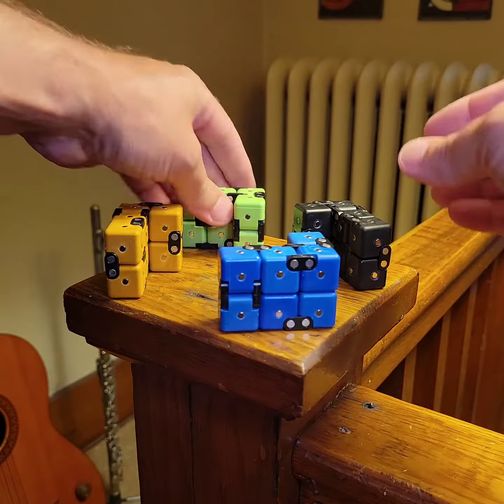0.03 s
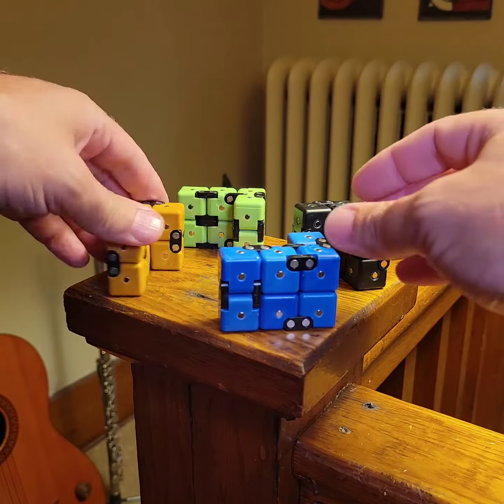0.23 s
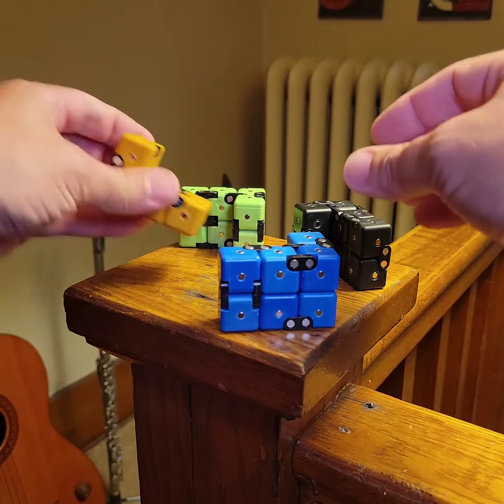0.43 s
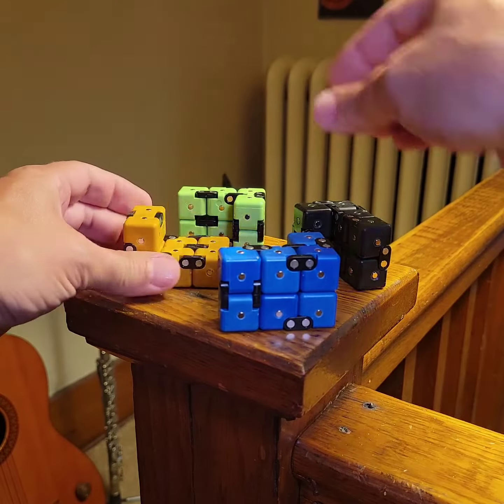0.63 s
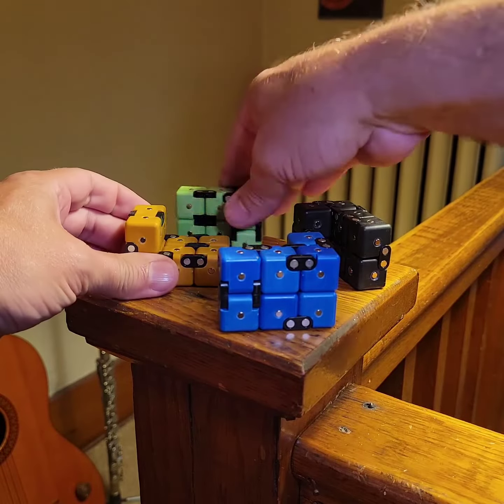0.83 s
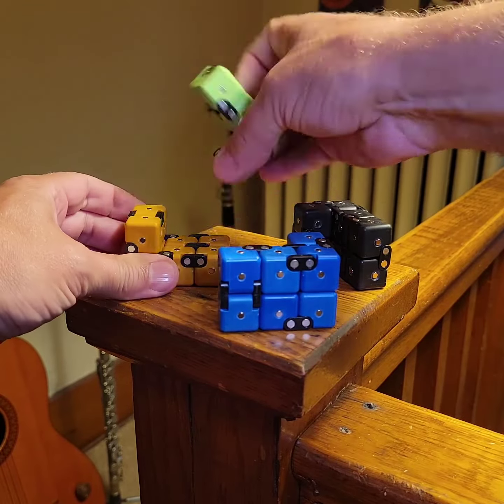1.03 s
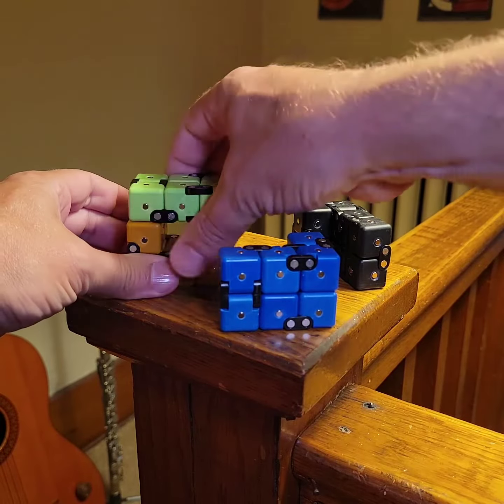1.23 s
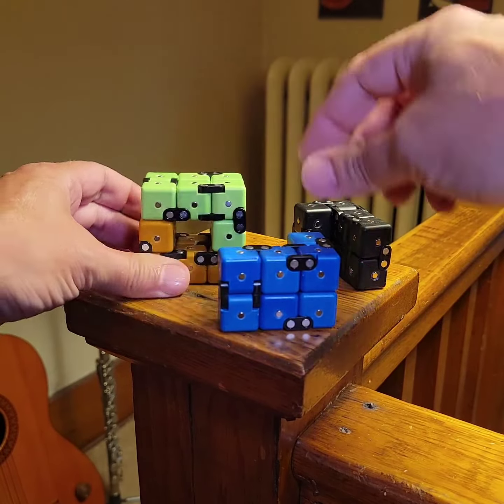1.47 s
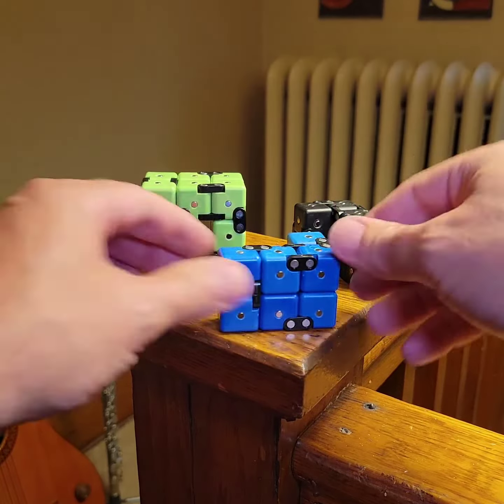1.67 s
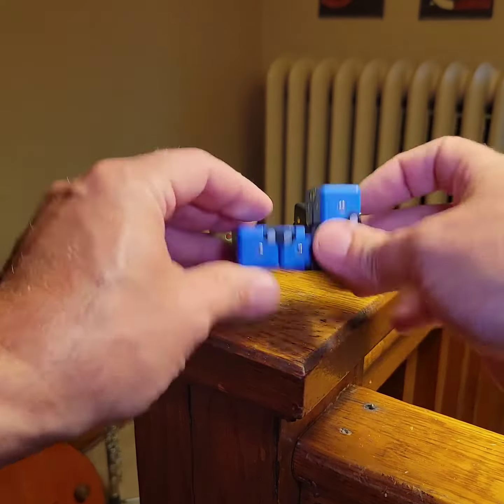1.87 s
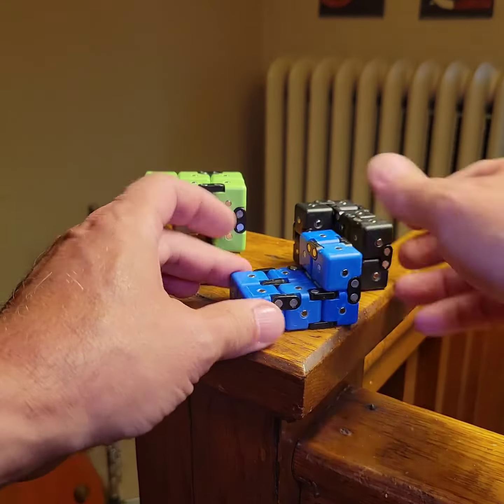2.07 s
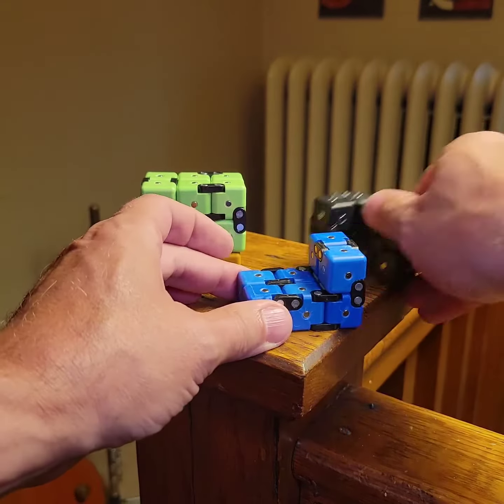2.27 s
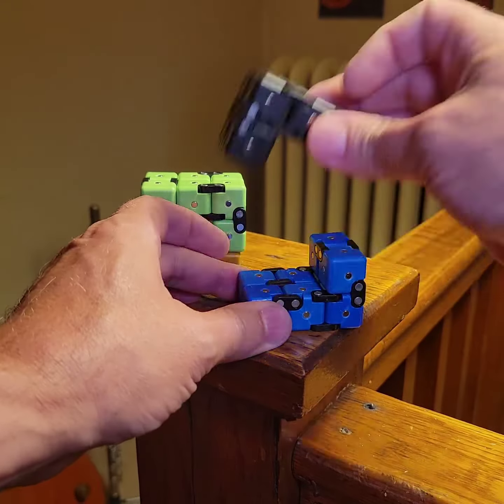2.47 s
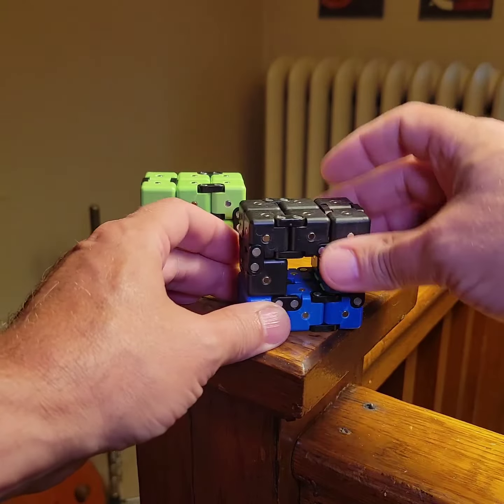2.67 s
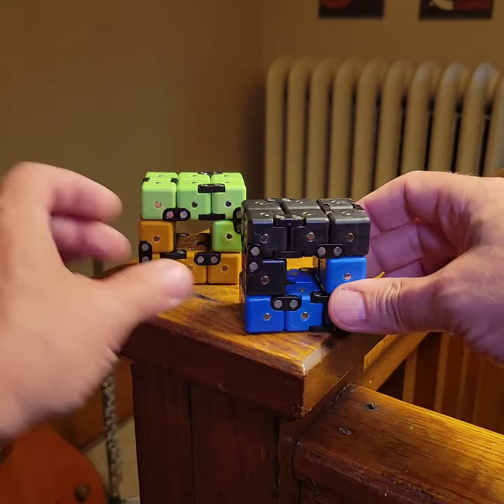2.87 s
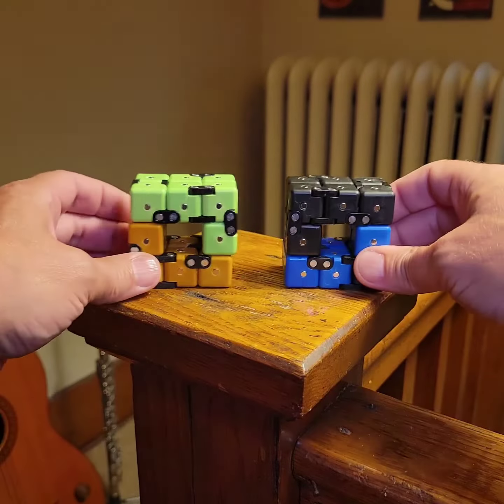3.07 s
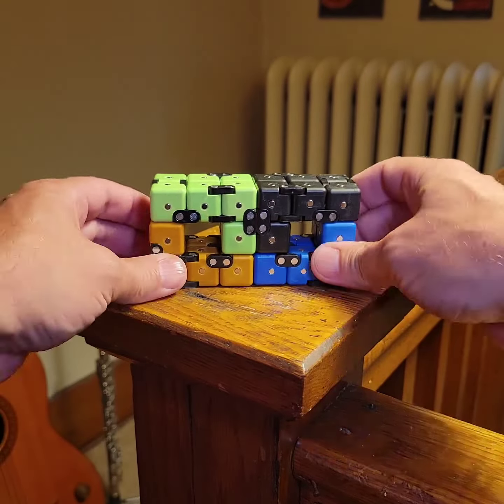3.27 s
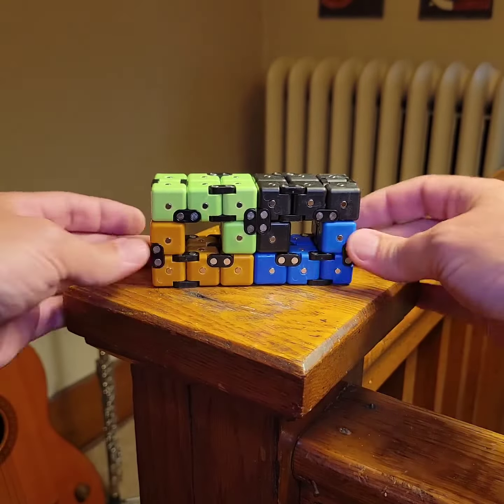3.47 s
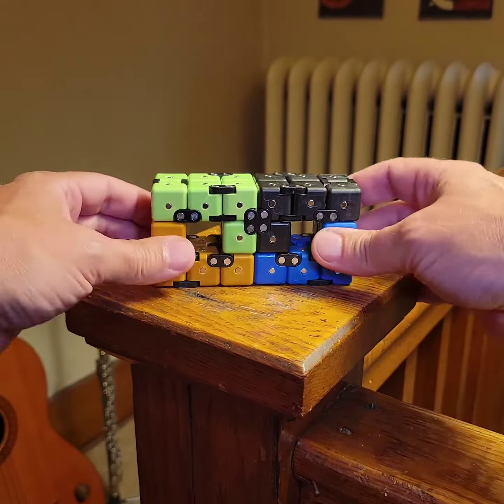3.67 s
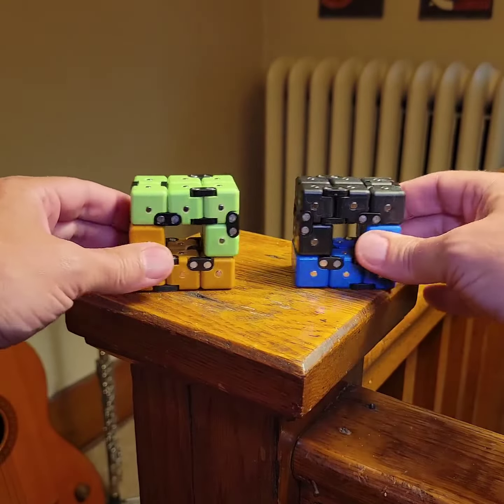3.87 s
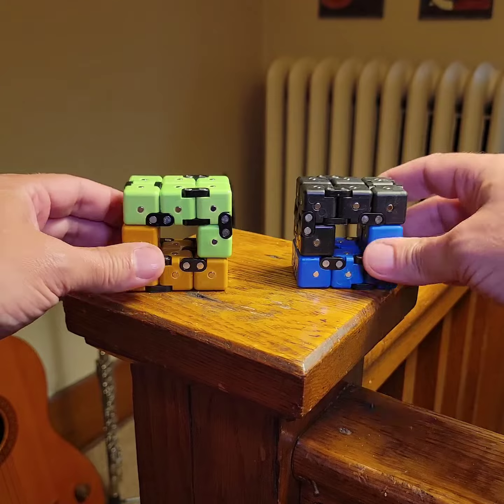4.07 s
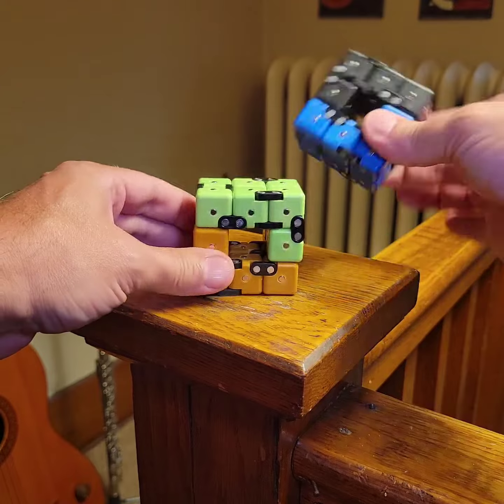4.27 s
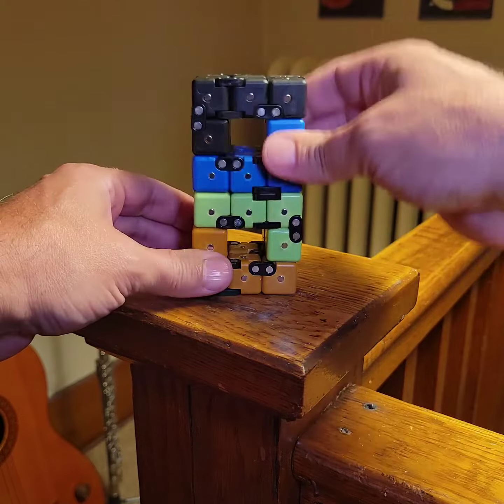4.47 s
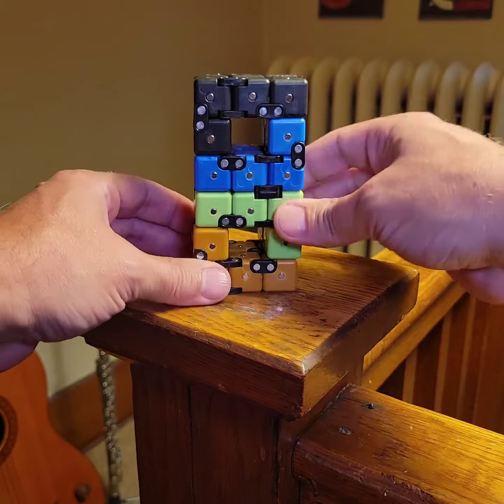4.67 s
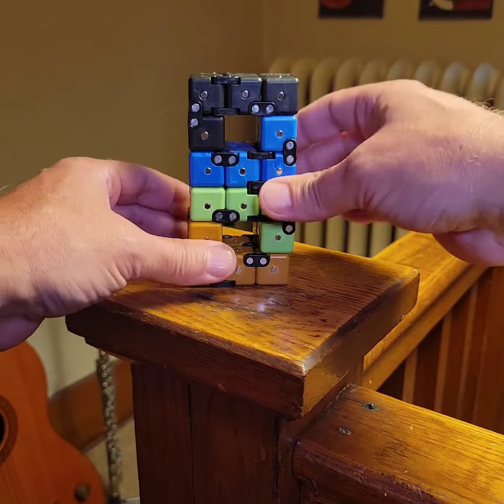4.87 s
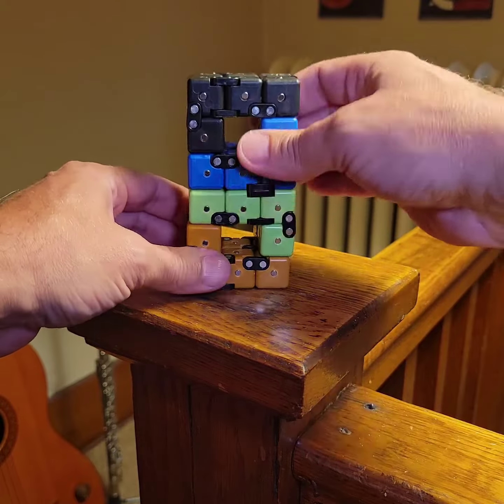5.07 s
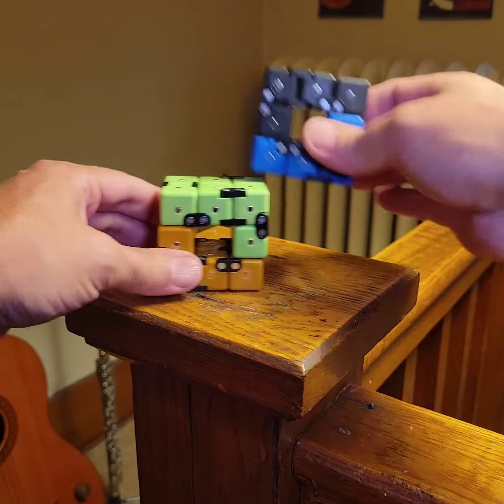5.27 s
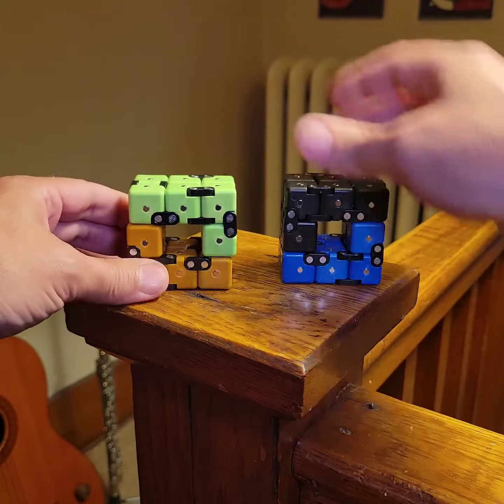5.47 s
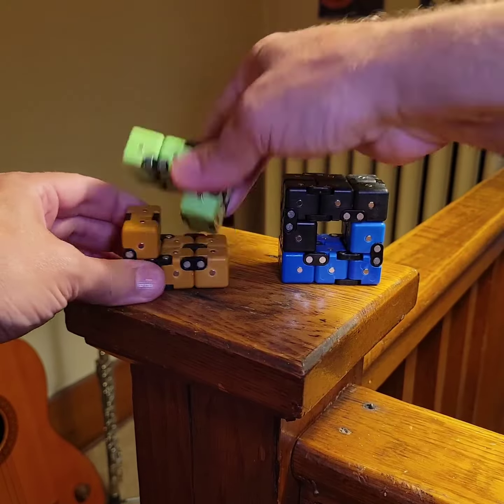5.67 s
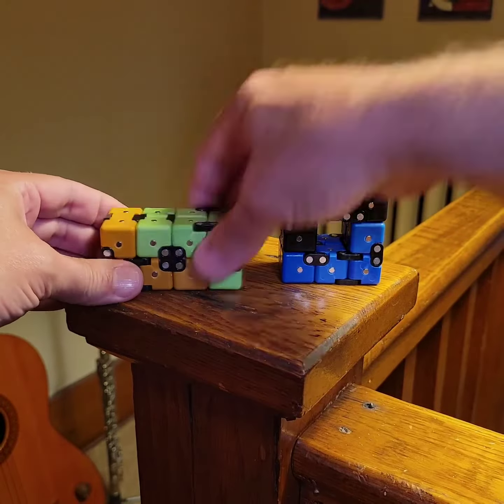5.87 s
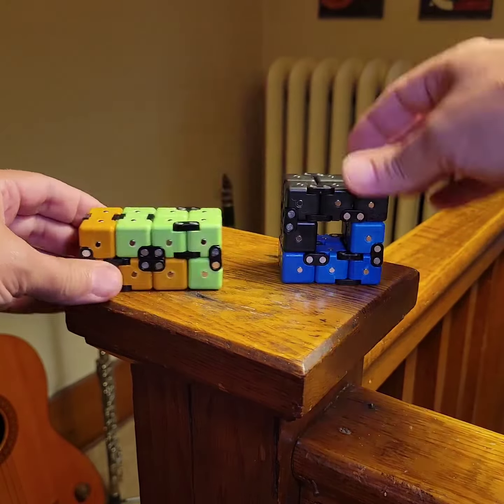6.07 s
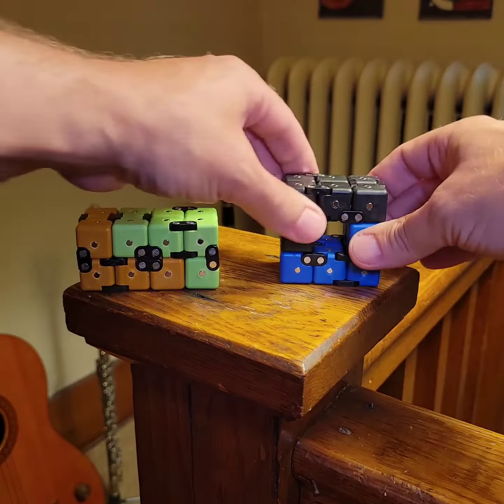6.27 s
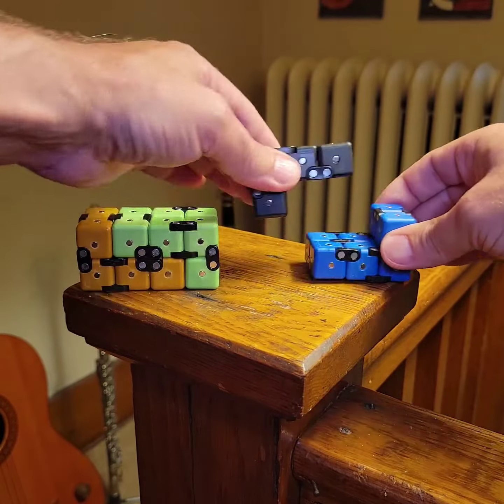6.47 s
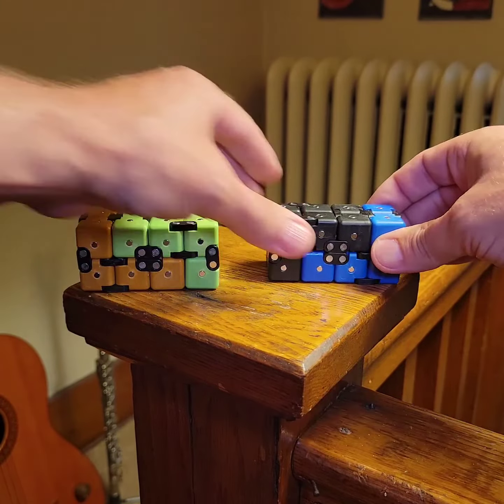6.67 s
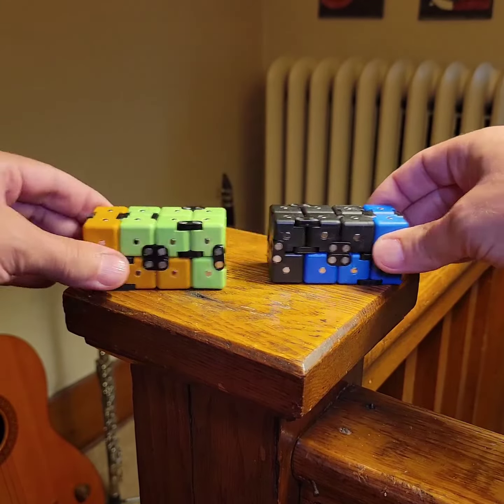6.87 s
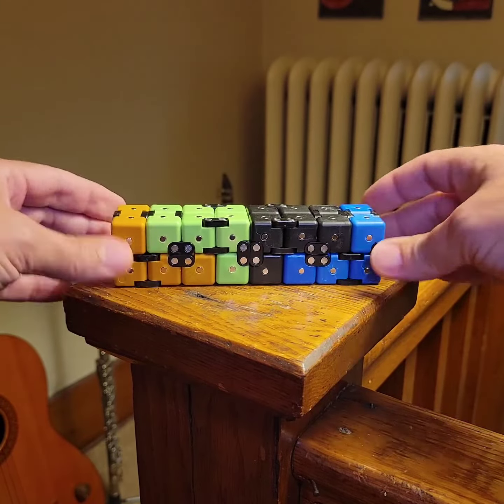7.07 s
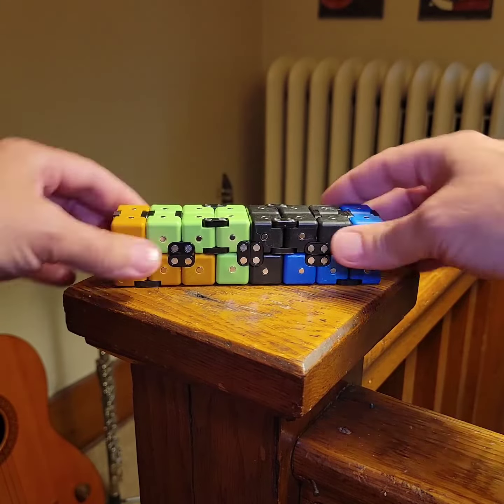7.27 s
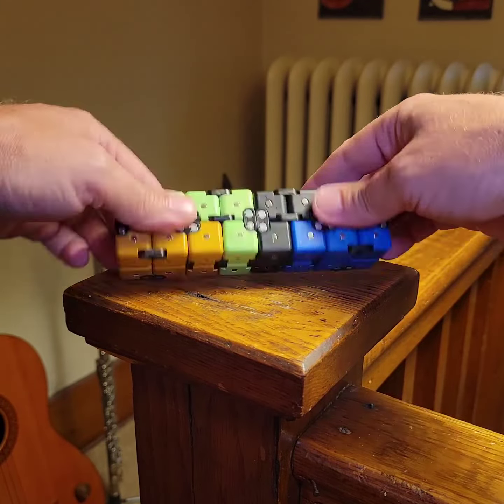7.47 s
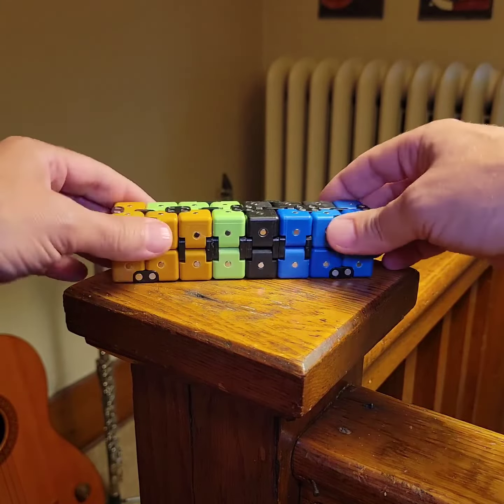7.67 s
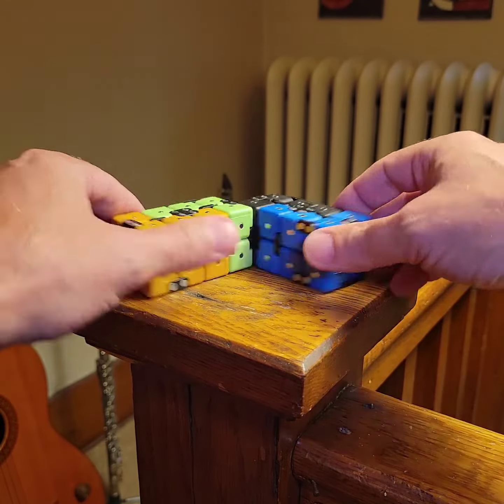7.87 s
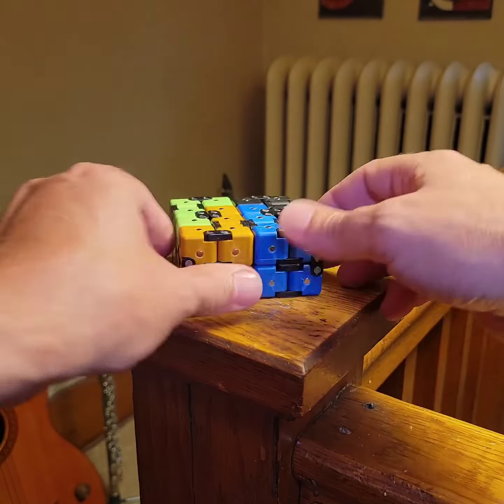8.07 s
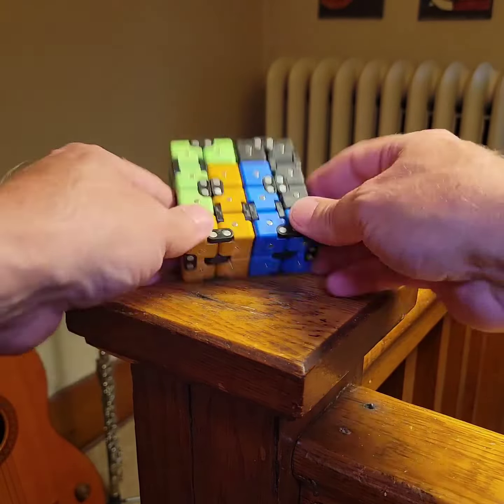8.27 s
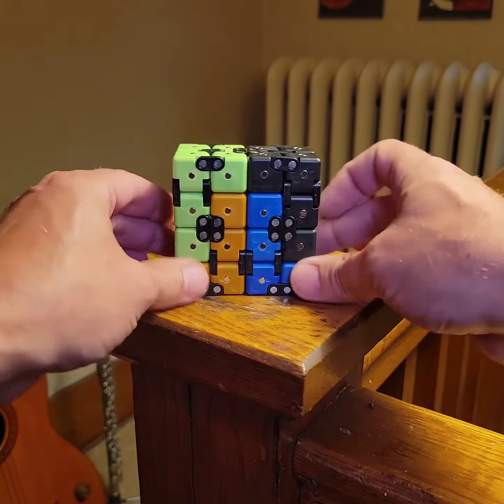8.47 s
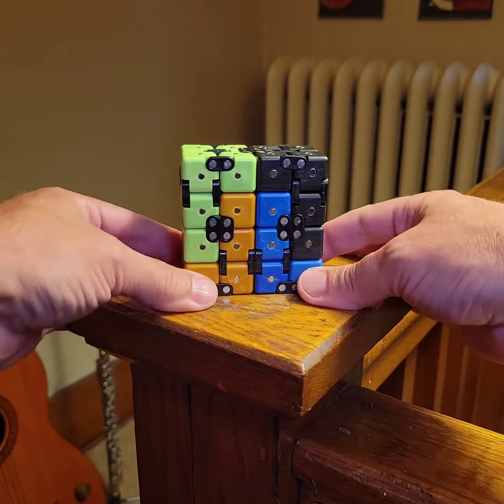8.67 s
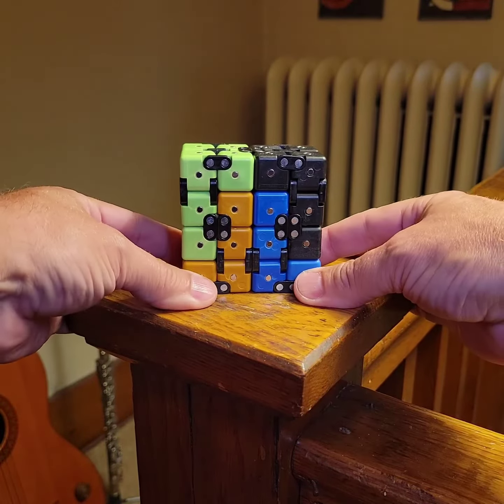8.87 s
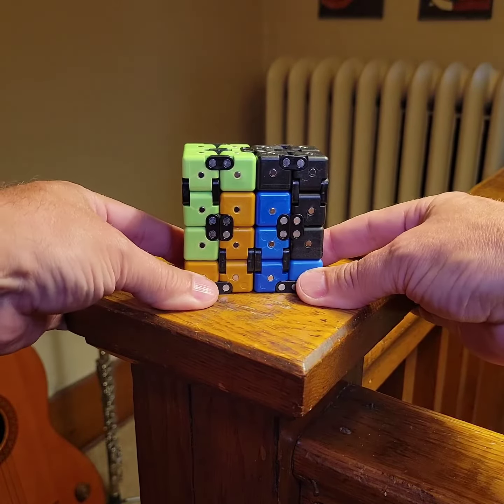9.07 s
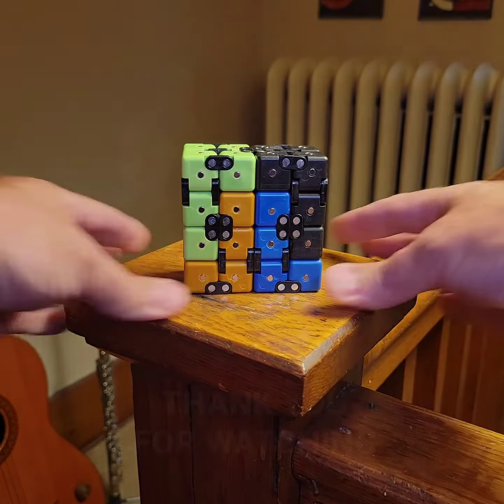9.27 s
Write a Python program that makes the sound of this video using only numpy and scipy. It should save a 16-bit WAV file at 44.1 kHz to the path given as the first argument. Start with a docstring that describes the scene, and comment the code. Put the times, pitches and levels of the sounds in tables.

```python
"""Magnetic folding cubes on a post

Plastic cubes with magnets are folded, stacked and pulled apart by hand on a wooden stair post.
Each closing is a hollow plastic clap that swells briefly and dies fast, with a bright magnet tick
and a thud from the post. In between, fingers nudge and slide the blocks.
A small room echoes briefly, and its low hum fades out at the end."""
import sys
import numpy as np
from scipy import signal
from scipy.fft import rfft, irfft, next_fast_len
from scipy.io import wavfile
from scipy.ndimage import uniform_filter1d, map_coordinates

SR = 44100
rng = np.random.default_rng(int(sys.argv[2]) if len(sys.argv) > 2 else 0)


def pcm_store(signal):
    """Save signal as 16-bit PCM."""
    levels = np.round(np.clip(np.atleast_2d(signal), -1, 1) * 32767)
    wavfile.write(sys.argv[1], SR, levels.astype(np.int16).T)


N = 410566

# blocks closing: (time [s], swell [s], relative level [dB], brightness [dB per octave],
# first ring [Hz], second ring [Hz], left minus right [dB], relative thud level [dB])
CLOSINGS = [(.437, .026, -29, -7, 1380, 2970, -2, -46.5), (.469, 0.015, -46.5, -5, 830, 2170, -3, -48),
            (1.167, .031, -28, -2.5, 1660, 5415, 0, -38.5),
            (1.854, 0.036, -31, -3.5, 1300, 3240, -6.5, -57.5),
            (1.869, 0.039, -29.5, 0, 1160, 3990, 1, -43), (2.474, 0.033, -29.5, -1.5, 812, 3120, -2, -37.5),
            (2.502, 0.031, -37, -2.5, 825, 1185, -1, -41.5), (3.2, 0.037, -33, 2, 697, 3110, -2, -50.5),
            (3.673, 0.029, -40.5, -5, 1147, 1794, 1.5, -49.5),
            (4.057, 0.012, -50, -15, 915, 1160, -2, -62.5),
            (4.4242, .005, -35, 3.5, 1420, 3000, -4.5, -34.5),
            (4.4278, .02, -33.5, 2, 1735, 3580, 3.5, -45.5),
            (5.304, 0.033, -24.5, 1, 1370, 2085, -1.5, -30),
            (5.823, 0.03, -28.5, 1.5, 1210, 4915, -2.5, -36),
            (6.306, .027, -32, 0, 1134, 4520, -1.5, -44.5), (6.538, 0.031, -27, 2.5, 2120, 3130, -1, -39.5),
            (6.857, 0.021, -39, -1.5, 1170, 4020, 2.5, -49),
            (7.4857, 0.0016, -27.5, -1, 1180, 2985, 1.5, -31.5),
            (7.49, 0.028, -27, -14.5, 690, 1175, -6.5, -38),
            (7.958, 0.0065, -33.5, 6, 2600, 2950, -1, -50.5), (8.35, 0.04, -28.5, -1.5, 685, 2876, 0, -31)]
# magnets meeting: (time [s], swell [s], level [dB])
MAGNET_TICKS = [(0.445, 0.02, -45), (1.172, 0.028, -40), (1.855, 0.0089, -40), (1.877, 0.032, -36.5),
                (2.479, 0.0076, -31), (3.207, 0.021, -30.5), (3.68, .023, -63), (4.424, .018, -29),
                (5.121, 0.01, -68), (5.313, 0.034, -33), (5.598, 0.0044, -63), (5.8252, 0.0086, -22.5),
                (6.316, 0.027, -47.5), (6.544, 0.027, -26), (6.864, 0.011, -39.5), (7.486, .014, -43),
                (7.637, .006, -63.5), (7.828, .013, -46.5), (7.943, .008, -56.5), (7.9692, 0.018, -30),
                (8.352, 0.024, -35)]
# fingers moving the blocks: (time [s], swell [s], relative level [dB], brightness [dB per octave])
SCUFFS = [(0.006, 0.11, -58, -.5), (0.317, 0.026, -58.5, -4), (0.773, 0.049, -67.5, 4.5),
          (1.699, .14, -65.5, -2.5), (2.254, .08, -61, -0.5), (2.917, 0.1, -52, 2), (2.948, 0.095, -52, -1),
          (4.095, 0.1, -63, 2.5), (4.656, 0.078, -69, 2.5), (5.08, 0.093, -63.5, -4),
          (5.112, 0.046, -54.5, 1.5), (5.557, 0.11, -63, -6.5), (5.602, .035, -53, -3.5),
          (6.401, .06, -60, -2), (6.453, 0.047, -52.5, 1), (6.842, 0.1, -61, -1), (7.399, 0.078, -54.5, -1),
          (7.428, .09, -58.5, -4), (7.627, 0.027, -57.5, 3), (7.67, .1, -60, -1), (7.736, .07, -60, 1),
          (7.827, 0.056, -42.5, 2.5), (7.84, .08, -46.5, -3.5), (7.943, .06, -47, 6),
          (8.202, 0.086, -58.5, 2.5), (8.455, 0.069, -57.5, 2)]
# hands leaning on the post: (time [s], level [dB])
HAND_BUMPS = [(2.916, -60), (4.058, -54.5), (5.111, -41.5), (5.199, -50.5), (5.602, -48), (7.659, -58),
              (7.743, -53), (7.832, -47)]
# tones at which the hollow blocks ring: (pitch [Hz], width [Hz], relative level [dB])
BLOCK_RINGS = [(325, 100, -8), (518, 80, -4.5), (712, 31, 2), (834, 51, 5), (1190, 110, 1.5),
               (1477, 140, -1.5), (1687, 68, 1.5), (1880, 50, 2), (2160, 160, -6), (2990, 190, 3.5),
               (3200, 190, -2.5), (3584, 120, -3), (3996, 110, -3.5), (4290, 94, -3.5), (4810, 160, -5),
               (5160, 300, -7.5), (5640, 330, -8)]
# tones at which a magnet rings in its seat: (pitch [Hz], width [Hz], relative level [dB])
MAGNET_RINGS = [(6350, 510, 7.5), (8430, 620, 4), (9360, 1100, -1.5), (9600, 2000, -6), (11300, 2500, -5),
                (12900, 300, -8.5), (16100, 2600, -9)]
# tones of the wooden post: (pitch [Hz], relative level [dB], time to fade by 60 dB [s])
POST_RINGS = [(54, -4, 0.081), (73, -0.5, .16), (113, -10, 0.19), (214.5, -13, 0.15), (272.4, -12.5, 0.095)]
# the room's echo: (frequency [Hz], time to fade by 60 dB [s])
ECHO_FADE = [(100, .25), (1000, 0.15), (4000, 0.12), (12000, .11)]
# the hum from bass to treble: (frequency [Hz], relative level [dB])
HUM_COLOUR = [(15, -32), (25, -15.5), (60, 2.5), (100, -6), (153, -13), (205, -3.5), (245, -12.5),
              (300, -4), (430, -14.5), (660, -20), (840, -16), (1000, -22.5), (1750, -27), (2550, -40),
              (3080, -33), (3450, -40.5), (5500, -43), (7500, -45.5), (16000, -43)]
# the hum's loudness over time: (time [s], level [dB])
HUM_LOUDNESS = [(0, -63.5), (8.7, -63), (8.85, -68), (8.97, -82.5), (9.06, -104), (9.31, -118)]

SIZE, LEAD = 16384, 4096  # samples in one hit's sound, and how many come before the hit
T = (np.arange(SIZE) - LEAD) / SR  # time around one hit [s]
HZ = np.fft.rfftfreq(SIZE, 1 / SR)
HIT_ENERGY = .02 * SR  # a 0 dB hit holds as much energy as 20 ms at level 1


def closing_blocks():
    """Blocks clap shut and knock the post; how they are folded and held brings out two rings."""
    edges_hz = [290, 1000, 2450, 3800, 5900]  # four bands: knock, shell, clack, edge
    balance_db = np.array([-8.5, -2.15, -2.37, -2])
    octaves_above_shell = np.array([0, 0, 1, 1.6])
    track = np.zeros((2, N))
    for time, swell, db, bright_db, first_hz, second_hz, pan_db, thud_db in CLOSINGS:
        rings = [(hz, 40 + hz / 35, 4) for hz in (first_hz, second_hz)]
        colour = body_colour(BLOCK_RINGS + rings, vary_db=1, detune=.0049, crack=.064)
        rings_per_band = np.histogram([first_hz, second_hz], edges_hz)[0]
        levels_db = db + balance_db + bright_db * octaves_above_shell + 3.5 * rings_per_band
        # claps with a longer swell also fade more slowly
        burst = swelling_burst(swell, fall_s=.015 + 1.2 * swell, grit_db=2)
        clap = ring_body(burst * late_knock(), colour, edges_hz, levels_db)
        clap *= amp([[pan_db / 2], [-pan_db / 2]])
        add(track, time - .0005, in_room(clap, echo_db=-11))
        add(track, time + .00069, amp(thud_db + 1) * post_thud(attack_s=.0047))
    return track


def late_knock(lag_s=.003, top_hz=970):
    """A filter that delays the bass, so the low knock comes just after the plastic's clack."""
    delay = lag_s * band(0, top_hz, order=4)
    return np.exp(-2j * np.pi * np.cumsum(delay) * HZ[1])


def magnet_ticks():
    """Magnets meet with a hard, bright tick that has a brief swell before it."""
    track = np.zeros((2, N))
    for time, swell, db in MAGNET_TICKS:
        colour = body_colour(MAGNET_RINGS, vary_db=4, detune=.026, crack=.12)
        burst = swelling_burst(swell, fall_s=.021, grit_db=5)
        tick = ring_body(burst, colour, edges_hz=[6000, 15800], levels_db=[db])
        add(track, time, in_room(tick, echo_db=-12.5))
    return track


def post_thud(attack_s):
    """The wooden post takes a hit and rings with a few low tones that die quickly."""
    t = np.maximum(T, 0)
    phases = rng.uniform(0, 2 * np.pi, (len(POST_RINGS), 2, 1))
    tunings = 1 + .054 * rng.standard_normal(len(POST_RINGS))
    thud = 0
    for (hz, db, fade_s), tuning, phase in zip(POST_RINGS, tunings, phases):
        thud += amp(db - 60 * t / fade_s) * np.sin(2 * np.pi * hz * tuning * t + phase)
    thud *= 1 - np.exp(-t / attack_s)
    return thud * np.sqrt(HIT_ENERGY / np.sum(thud ** 2, axis=1, keepdims=True))


def handling():
    """Plastic on wood and loose hinges scuff softly, and the hands bump the post."""
    edges_hz = [220, 1000, 2200, 4600, 14000]  # four bands: knock, shell, clack, hiss
    balance_db = np.array([-2, -3.5, -9.5, -14.5])
    octaves_from_middle = np.array([-1.5, -.4, .6, 1.8])
    track = np.zeros((2, N))
    for time, swell, db, bright_db in SCUFFS + grip_shifts():
        colour = body_colour(BLOCK_RINGS, vary_db=2.5, detune=.009, crack=.081)
        levels_db = db + balance_db + bright_db * octaves_from_middle
        burst = swelling_burst(swell, fall_s=1.2 * swell, grit_db=2.5)
        scuff = ring_body(burst, colour, edges_hz, levels_db)
        add(track, time, in_room(scuff, echo_db=-10.5))
    for time, db in HAND_BUMPS:
        add(track, time, amp(db) * post_thud(attack_s=.0073))
    return track


def grip_shifts(count=12, until_s=8.7, swell_s=.18, db=-74, bright_db=-5):
    """Fingers shift their grip faintly at random moments; gives rows like those of SCUFFS."""
    chance = rng.uniform(-1, 1, (count, 2))
    return [(until_s * (k + .5 + later / 2) / count, swell_s, db + 2.5 * louder, bright_db)
            for k, (later, louder) in enumerate(chance)]


def swelling_burst(swell_s, fall_s, grit_db):
    """Gritty noise that swells to a peak and falls by 60 dB in fall_s; gives its spectrum."""
    shape_db = -60 * np.where(T < 0, -T / swell_s, T / fall_s)
    grit = map_coordinates(rng.standard_normal(SIZE), [np.arange(SIZE) * 1500 / SR], order=1)
    return rfft(amp(shape_db + grit_db * grit) * rng.standard_normal((2, SIZE)))


def body_colour(rings, vary_db, detune, crack):
    """How strongly each frequency sounds: rings that vary with the spot hit, over a plain crack."""
    chance = rng.standard_normal((len(rings), 2))
    power = crack ** 2
    for (hz, width, db), (higher, louder) in zip(rings, chance):
        off_pitch_hz = HZ - hz * (1 + detune * higher)
        power += amp(db + vary_db * louder) ** 2 / (1 + (2 * off_pitch_hz / width) ** 2)
    return np.sqrt(power)


def ring_body(burst, colour, edges_hz, levels_db):
    """A burst makes a body ring; each frequency band gets its own level."""
    gain = 0
    for low, high, db in zip(edges_hz, edges_hz[1:], levels_db):
        part = colour * band(low, high)
        energy = np.sum(irfft(burst * part) ** 2, axis=1, keepdims=True)
        gain += amp(db) * part * np.sqrt(HIT_ENERGY / energy)
    return irfft(burst * ring_after_hit(gain))


def ring_after_hit(gain):
    """Turn gains into a filter that rings only after it is struck, as real things do."""
    cepstrum = irfft(np.log(gain + 1e-5 * gain.max()))  # the log gain, laid out along time
    forward_only = 1 + np.sign(np.fft.fftfreq(SIZE))
    return np.exp(rfft(cepstrum * forward_only))


def in_room(sound, echo_db):
    """The room adds a short, smooth echo whose treble dies first."""
    hz, t, noise = signal.stft(rng.standard_normal((2, SIZE)), SR, nperseg=256)
    fade = amp(-60 * t / curve_at(ECHO_FADE, hz)[:, None])
    tail = signal.istft(noise * fade, SR, nperseg=256)[1]
    tail *= 1 - np.exp(-np.arange(tail.shape[1]) / SR / .009)  # the echo takes a moment to build
    tail /= np.linalg.norm(tail, axis=1, keepdims=True)
    return sound + amp(echo_db) * signal.fftconvolve(sound, tail, axes=1)[:, :SIZE]


def room_hum(patch_db=3.5):
    """The house hums low, with patches of sound that come and go, and fades at the end."""
    hz, _, noise = signal.stft(rng.standard_normal((2, N)), SR, nperseg=4096)
    patches = uniform_filter1d(rng.standard_normal(noise.shape[1:]), size=3, axis=0)
    patches = uniform_filter1d(patches, size=3, axis=1)
    colour_db = curve_at(HUM_COLOUR, hz)[:, None] + patch_db * patches / patches.std()
    hum = signal.istft(noise * amp(colour_db), SR, nperseg=4096)[1][:, :N]
    t = np.arange(N) / SR
    level_db = np.interp(t, *np.transpose(HUM_LOUDNESS))
    drift_db = 1.5 * map_coordinates(rng.standard_normal(200), [t * 7], mode="wrap")
    return hum / hum.std() * amp(level_db + drift_db)


def amp(db):
    """Turn decibels into a gain to multiply by."""
    return 10 ** (np.asarray(db) / 20)


def curve_at(points, hz):
    """Read between (frequency, value) points, with octaves evenly spaced."""
    point_hz, values = np.transpose(points)
    return np.interp(np.log(hz + 1), np.log(point_hz + 1), values)


def band(low_hz, high_hz, order=16):
    """Gains that let one band through; a higher order gives steeper sides."""
    bass_cut = 1 + (low_hz / (HZ + 1)) ** (2 * order)
    treble_cut = 1 + (HZ / high_hz) ** (2 * order)
    return (bass_cut * treble_cut) ** -.5


def add(track, time, sound):
    """Mix a sound into the track so that its hit lands at this time."""
    start = round(time * SR) - LEAD
    piece = sound[:, max(0, -start):N - start]
    start = max(0, start)
    track[:, start:start + piece.shape[1]] += piece


def scene():
    """The cubes and hands over the room's hum."""
    return closing_blocks() + magnet_ticks() + handling() + room_hum()


def record(dry):
    """Cut away the very highest treble."""
    top_hz, slope_hz = 16450, 600
    size = next_fast_len(N + SIZE)
    keep = np.clip((top_hz - np.fft.rfftfreq(size, 1 / SR)) / slope_hz, 0, 1)
    return irfft(rfft(dry, size) * keep, size)[:, :N]


dry = scene()
out = record(dry)
pcm_store(out)
```